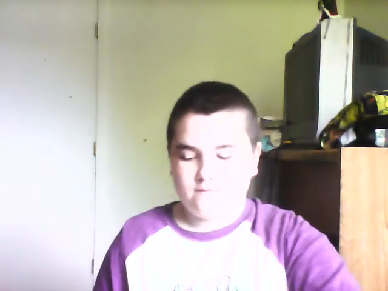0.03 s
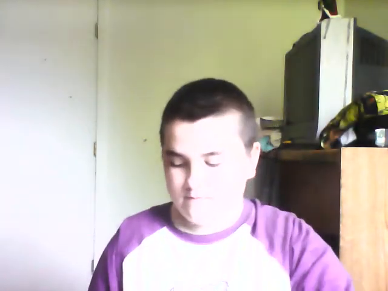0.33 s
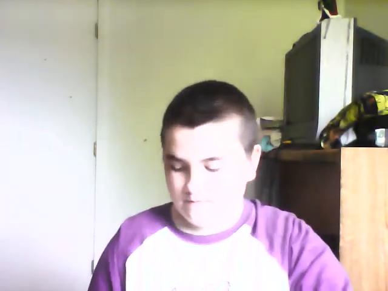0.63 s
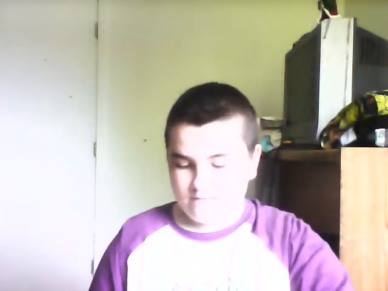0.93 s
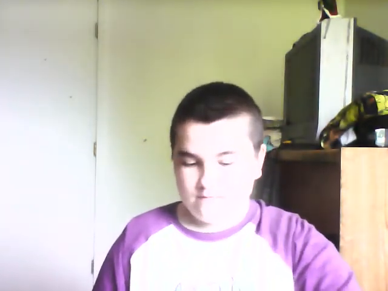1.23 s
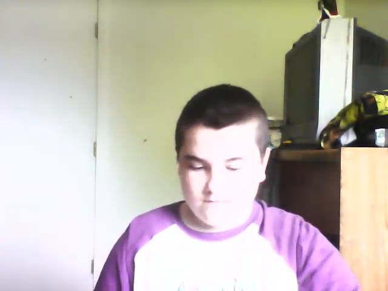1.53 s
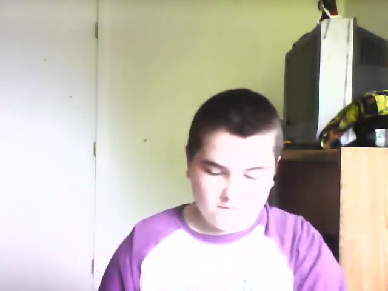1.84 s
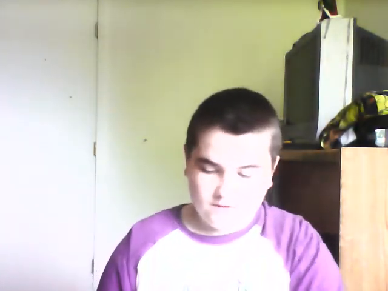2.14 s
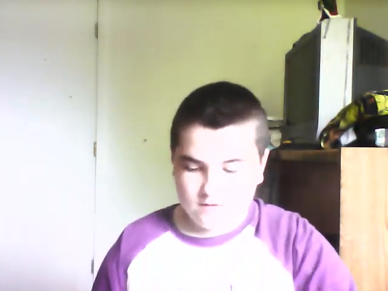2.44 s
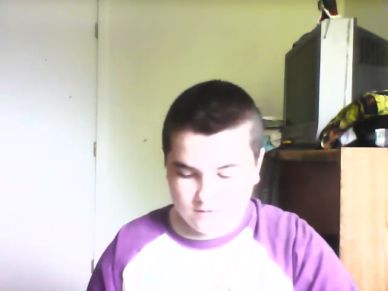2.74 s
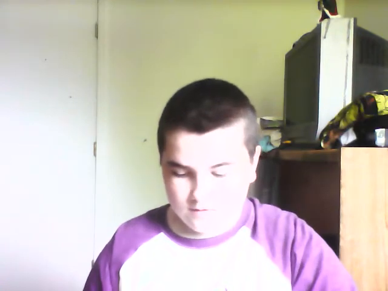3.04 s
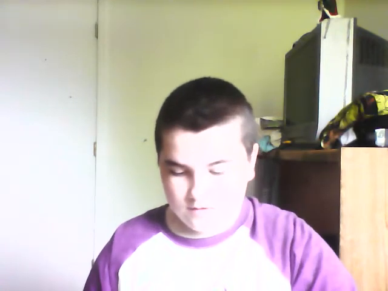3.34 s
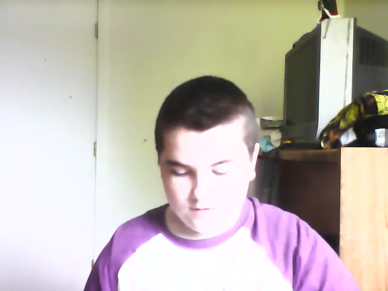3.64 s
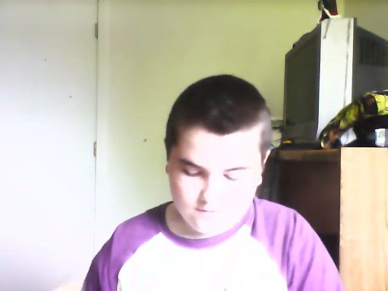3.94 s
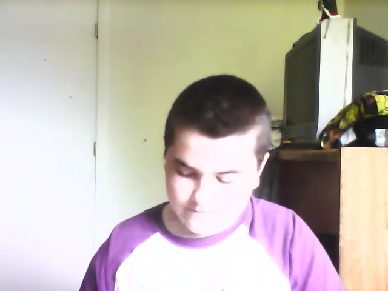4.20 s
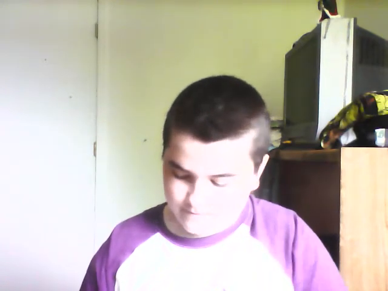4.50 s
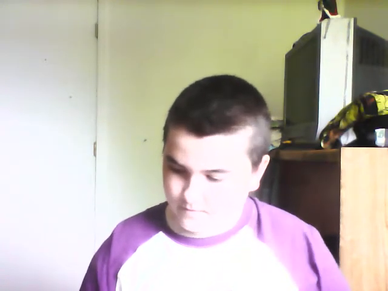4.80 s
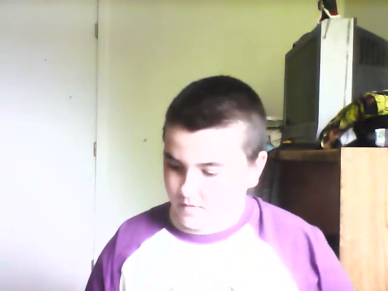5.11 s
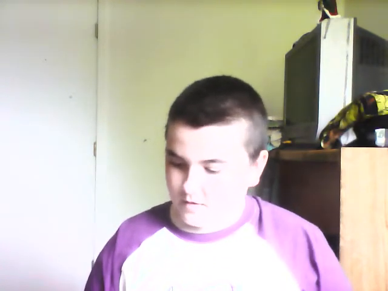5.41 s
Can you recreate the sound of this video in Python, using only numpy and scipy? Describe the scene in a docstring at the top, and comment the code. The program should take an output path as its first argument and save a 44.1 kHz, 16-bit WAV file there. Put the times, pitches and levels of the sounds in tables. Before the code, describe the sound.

A hardcover book is handled close to a small microphone in a quiet room. Faint rubbing leads into a page sliding across its neighbour, crinkling and flipping over with a sharp snap. After a brief lull, another page swishes across and flaps down with a few crisp snaps and a knock on the cover. Soft sliding and small ticks trail off over faint hiss.

```python
"""Sheets slide and rub as a hardcover book is handled close to a desk microphone in a small, quiet room.
Pages flap over and snap straight; the cover shifts and knocks. A faint hum comes and goes early on.
Rubs and swishes are filtered stick-slip clicks over hiss. Snaps and knocks are impulses with a brief
chatter: a damped ring plus a dry crack. Book resonances and a short room tail colour all but the hum
and the room and microphone hiss."""
import sys
import numpy as np
from scipy import signal
from scipy.fft import rfft, irfft, next_fast_len
from scipy.io import wavfile

SR = 44100
rng = np.random.default_rng(int(sys.argv[2]) if len(sys.argv) > 2 else 0)


def digitize_waveform(pressure):
    """Quantize a signal to 16-bit integers and store it at the path in sys.argv[1].

    Rows of a 2-D input are taken as channels; values are limited to [-1, 1].
    """
    field = np.atleast_2d(pressure).T
    bounded = np.clip(field, -1, 1)
    quanta = np.round(bounded * 32767).astype(np.int16)
    wavfile.write(sys.argv[1], SR, quanta)


N = 249517
TIME = np.arange(N) / SR

# Spectral shapes: freq_hz, relative_db
FLOOR_SPECTRUM = [(25, -6), (42, -6.5), (60, -18.5), (100, -23.5), (130, -9), (400, -4.5), (540, -2.5),
                  (800, -7.5), (1150, -11.5), (1380, -4.5), (1700, -24.5), (4000, -24), (8200, -23.5),
                  (10500, -28.5), (15500, -53)]  # room and microphone hiss
RUB_SPECTRUM = [(70, -27.5), (105, -40.5), (130, -14), (220, 1), (350, 2), (500, 6.5), (650, -2),
                (850, 1.5), (1300, -36)]  # cover rubbing
FLEX_SPECTRUM = [(400, -16.5), (650, -12.5), (890, 8.5), (1150, 1.5), (1750, 8), (2350, -3.5), (3000, -15),
                 (5000, -35)]  # sheets flexing
SLIDE_SPECTRUM = [(1500, -26), (2200, -2.5), (2800, 2.5), (3600, 0.5), (4700, 1.5), (6200, -4),
                  (8500, -16.5), (10000, -33.5), (15500, -40.5)]  # paper sliding
# Steady faint background hiss in the rub, flex and slide bands: rub_db, flex_db, slide_db
HISS_FLOOR_LEVELS = [-82.5, -78, -79]
# Short hand moves: start_s, length_s, rub_db, flex_db, slide_db
HAND_MOVES = [ (0.022, 0.0575, -72, -72.5, -66.5), (0.287, 0.0887, -61.5, -61.5, -61),
              (0.443, 0.0576, -70, -74.5, -55), (0.627, 0.054, -83, -76, -58.5),
              (1.244, 0.1385, -65, -53.5, -49), (1.426, 0.1855, -72, -64, -50),
              (1.511, 0.069, -49.5, -40.5, -70), (1.693, 0.127, -52.5, -38, -47),
              (1.91, 0.176, -55.5, -51.5, -52), (2.04, 0.1385, -46, -50, -51.5),
              (2.191, 0.1257, -61, -54, -50.5), (2.75, 0.0197, -76.5, -66, -58.5),
              (2.848, 0.197, -69.5, -62.5, -52), (3.201, 0.0615, -76, -60.5, -54.5),
              (3.317, 0.089, -58, -50.5, -47), (3.539, 0.0219, -55, -51, -75),
              (3.598, 0.36, -71, -64.5, -46.5), (4.004, 0.038, -61, -54.5, -57.5),
              (4.158, 0.1606, -77, -66, -53), (4.377, 0.112, -78, -67, -53), (4.464, 0.1316, -59, -59, -58),
              (5.182, 0.099, -70.5, -85.5, -70), (5.348, 0.0461, -78.5, -62, -52.5),
              (5.499, 0.0425, -63, -63.5, -61), (5.603, 0.025, -65, -76.5, -54.5)]
# Paper buckling, bumps on the page block: start_s, level_db, ring_hz, crack_re_ring_db, chatter_s
PAPER_SNAPS = [ (0.0638, -46, 2320, 2, 0.0067), (0.077, -50, 323, -1.5, 0.012),
               (0.276, -46, 3220, 2, 0.017), (0.341, -35.5, 5500, 9, 0.0113),
               (0.4734, -29, 2988, -18.5, 0.0036), (0.868, -36.5, 2760, 4.5, 0.004),
               (1.03, -37.5, 466, -6, 0.0056), (1.121, -30, 2150, 7.5, 0.0021),
               (1.1395, -29.5, 2150, -4.5, .006), (1.167, -36.5, 2206, -8, 0.0254),
               (1.354, -31, 2200, 16.5, 0.0057), (1.362, -33, 2646, 3.5, 0.0084),
               (1.6835, -24.5, 4100, 24, 0.0176), (1.725, -21.5, 1171, 5, 0.0117),
               (1.8125, -24.5, 2970, 8.5, 0.00254), (1.8409, -6, 2337, 2, 0.00259),
               (1.843, -23.5, 651, -8, 0.00227), (2.216, -28, 1020, 10.5, 0.0131),
               (2.5221, -33, 330, -32, 0.0013), (2.5534, -52.5, 353, -23.5, .004),
               (2.6156, -23, 4378, -11, 0.00688), (2.6312, -29, 3520, -11.5, 0.0072),
               (3.2284, -29, 4650, -18, 0.0054), (3.3404, -24.5, 1230, 34.5, 0.0067),
               (3.44, -32, 1410, -5.5, 0.0074), (3.636, -12.5, 1240, -4, 0.0028),
               (3.882, -18, 6850, -34.5, 0.0046), (3.8892, -13, 1150, 2.5, 0.00435),
               (4.659, -50, 2350, -4.5, 0.0073), (5.439, -52, 298, -15.5, 0.019)]
# Settling rustle re its snap or tap: rub_db, flex_db, slide_db
SETTLE_LEVELS = [-37, -29.5, -34]
# Ring pitch that stirs each rustle most: rub_hz, flex_hz, slide_hz
SETTLE_PITCHES = [300, 1092.4, 4940]
# Page drawn across its neighbour, one curve per draw: time_s, crinkle_db, hiss_db
PAGE_DRAWS = [
    [(0.695, -71, -61.5), (0.701, -53.5, -49), (0.715, -53.5, -46.5), (0.815, -60.5, -48.5),
     (0.963, -47, -36.5), (1.047, -43, -43), (1.081, -51, -43), (1.173, -56, -54.5), (1.25, -70.5, -64)],
    [(3.025, -54.5, -36.5), (3.037, -54.5, -49), (3.057, -51, -40), (3.097, -49, -37.5),
     (3.135, -49.5, -37.5), (3.215, -55, -63.5)],
]
# Page flaps and edge scrapes: peak_s, level_db, length_s, centre_hz, width_hz
PAGE_SWISHES = [ (0.703, -45, .014, 3330, 3020), (0.926, -52, 0.0458, 8800, 5960),
                (0.925, -43, .07, 3700, 3400), (1.315, -44.5, .05, 4420, 880),
                (1.306, -39.5, 0.0345, 2150, 800), (1.664, -46.5, .012, 1020, 933),
                (1.968, -38.5, 0.0146, 1150, 950), (2.223, -39.5, 0.0374, 1100, 995),
                (2.287, -57.5, 0.066, 7500, 6000), (2.848, -47, .014, 4400, 1500),
                (2.912, -50, .17, 4950, 850), (3.052, -56.5, 0.047, 8920, 7000),
                (3.039, -44, .012, 3980, 2980), (3.063, -33.5, .075, 3850, 1900),
                (3.385, -41, .01, 3340, 3700), (3.618, -28.5, .01, 1050, 675),
                (3.63, -24.5, 0.0135, 1400, 1300), (3.682, -17, 0.0178, 1700, 1404),
                (3.689, -27.5, 0.0367, 1080, 900), (3.879, -48, 0.0042, 8200, 4480),
                (3.892, -28, 0.0234, 1930, 3000), (4.201, -67, 0.252, 6400, 3967),
                (4.545, -71, 0.057, 7020, 6000), (5.335, -47, 0.014, 3960, 3900)]
# Hum envelope: time_s, level_db
HUM_LEVELS = [(0, -110), (1.0, -74), (1.3, -77.5), (1.5, -66), (1.8, -64.5), (2.0, -73.5), (2.25, -100)]
# Taps on the stiff cover: start_s, level_db, crack_re_ring_db
COVER_TAPS = [(1.2276, -46, -3.5), (1.579, -28.5, 1), (3.789, -11, 7), (5.331, -32.5, -8)]
# Room decay: freq_hz, t60_s
ROOM_DECAY = [(150, 0.44), (500, 0.279), (1500, 0.3233), (4000, 0.2685), (8000, 0.37), (15000, 0.51)]
# Modes of the open book on the desk: centre_hz, width_hz, gain_db
BOOK_MODES = [(663.8, 55, 1), (879, 240, -5.5), (1044, 28, -4), (1219, 17, -7.5), (1350, 29, -8.5),
              (1691, 23, -11), (2014, 22, 0), (2400.6, 100, -6), (2837, 150, -12), (4354, 39, -19)]


def from_db(db):
    """Decibels to gain."""
    return 10 ** (np.asarray(db) / 20)


def rms_one(x):
    """Scale to rms 1."""
    return x / np.sqrt(np.mean(x ** 2) + 1e-20)


def peak_one(x):
    """Scale to peak 1."""
    return x / (np.abs(x).max() + 1e-20)


def in_time(rows):
    """Curve columns, interpolated per sample."""
    time_s, *columns = np.transpose(rows)
    return [np.interp(TIME, time_s, column) for column in columns]


def at_hz(points, hz):
    """Table lookup on a log-frequency axis."""
    freq_hz, value = np.transpose(points)
    return np.interp(np.log(np.maximum(hz, 1)), np.log(freq_hz), value)


def coloured(x, spectrum):
    """Minimum-phase spectral shaping; rms 1."""
    size = next_fast_len(2 * (N // 2 + 1))
    gain = from_db(at_hz(spectrum, np.fft.rfftfreq(size, 1 / SR)))
    cepstrum = irfft(np.log(gain), size)
    cepstrum[1:size // 2] *= 2
    cepstrum[size // 2 + 1:] = 0
    return rms_one(irfft(rfft(x, size) * np.exp(rfft(cepstrum)), size)[:N])


def butter(x, edges_hz, kind, order):
    """Butterworth filter."""
    return signal.sosfilt(signal.butter(order, edges_hz, kind, fs=SR, output="sos"), x)


def band(x, low_hz, high_hz, order):
    """Band-pass, at least 1 % wide."""
    return butter(x, [min(low_hz, high_hz / 1.01), high_hz], "band", order)


def resonance(x, hz, width_hz, order):
    """Band-pass by geometric centre and width."""
    low_hz = np.hypot(hz, width_hz / 2) - width_hz / 2
    return band(x, low_hz, low_hz + width_hz, order)


def drift(rate_hz):
    """Gaussian values joined by ramps."""
    steps = rng.standard_normal(N // 20)
    return np.interp(TIME * rate_hz, np.arange(len(steps)), steps)


def noise_floor(level_db=-71):
    """Steady room and microphone hiss."""
    return from_db(level_db) * coloured(rng.standard_normal(N), FLOOR_SPECTRUM)


def friction(slips_per_s, spread_db, hiss_gain, flutter_db):
    """Fibres catch and slip: uneven clicks over hiss, under wavering pressure."""
    sizes = from_db(spread_db * np.minimum(rng.exponential(1, N), 4))
    signs = rng.choice([-1, 1], N)
    slips = rms_one(sizes * signs * (rng.random(N) < slips_per_s / SR))
    return (slips + hiss_gain * rng.standard_normal(N)) * from_db(flutter_db * drift(rate_hz=110))


def bending(x, depth=.55, rate_hz=32, relative_width=0.0843):
    """Resonances of a bending sheet come and go; rms 1."""
    modes_hz = np.geomspace(350, 7500, 22)
    modes = sum(drift(rate_hz) * resonance(x, hz, relative_width * hz, order=1) for hz in modes_hz)
    return rms_one(x + depth * modes)


def hand_moves(attack_s=.024, release_s=0.0306, sag_db_per_s=5):
    """Hand pressure builds, sags, lets go. Returns rub, flex, slide power."""
    power = np.zeros((3, N))
    for start_s, length_s, *levels_db in HAND_MOVES:
        t = np.maximum(TIME - start_s, 0)
        pressure = np.minimum(t / attack_s, 1) * from_db(-sag_db_per_s * t)
        release = np.exp(-np.maximum(t - length_s, 0) / release_s)
        power += np.outer(from_db(levels_db), pressure * release) ** 2
    return power


def handling():
    """The cover rubs dully; sheets crinkle as they flex and hiss as they slide."""
    power = hand_moves() + settling() + page_draws() + from_db(HISS_FLOOR_LEVELS)[:, None] ** 2
    rub_gain, flex_gain, slide_gain = np.sqrt(power)
    rub = friction(slips_per_s=900, spread_db=3.5, hiss_gain=.8, flutter_db=1.24)
    flex = bending(friction(slips_per_s=2700, spread_db=1.5, hiss_gain=1.0, flutter_db=3.03))
    slide = bending(friction(slips_per_s=5800, spread_db=3.5, hiss_gain=.9, flutter_db=2.5))
    return (rub_gain * coloured(rub, RUB_SPECTRUM)
            + flex_gain * coloured(flex, FLEX_SPECTRUM)
            + slide_gain * coloured(slide, SLIDE_SPECTRUM))


def contacts(tap_hz=941, tap_width_hz=254.5, tap_top_hz=4340, tap_chatter_s=.003):
    """Taps and snaps as rows: start_s, level_db, ring_hz, width_hz, crack_db, top_hz, chatter_s."""
    rows = [(start_s, level_db, tap_hz, tap_width_hz, crack_db, tap_top_hz, tap_chatter_s)
            for start_s, level_db, crack_db in COVER_TAPS]
    for start_s, level_db, ring_hz, crack_db, chatter_s in PAPER_SNAPS:
        # A smaller, stiffer patch rings higher and wider and cracks brighter.
        width_hz = 430.5 * (ring_hz / 1000) ** 0.76
        top_hz = 3670 * (ring_hz / 1000) ** 0.414
        rows.append((start_s, level_db, ring_hz, width_hz, crack_db, top_hz, chatter_s))
    return rows


def impact(ring_hz, width_hz, crack_db, top_hz, chatter_s, chatter_db=-19, crack_low_hz=330):
    """A sheet buckles or the cover is tapped: ring plus dry crack. Returns direct sound, room send."""
    t = TIME[:SR // 12]
    push = from_db(chatter_db) * rng.standard_normal(len(t)) * np.exp(-t / chatter_s) + 1e-18
    push[0] += 1
    ring = peak_one(resonance(push, ring_hz, width_hz, order=2))
    crack = band(push, crack_low_hz, top_hz, order=2)
    crack = peak_one(butter(crack, top_hz, "low", order=5))
    direct = peak_one(ring + from_db(crack_db) * crack)
    # Colour varies with direction: the room gets a broader band at equal power.
    broad = resonance(push, ring_hz, width_hz + 0.44 * ring_hz, order=1)
    send = rms_one(butter(broad, top_hz, "low", order=5)) * direct.std()
    return np.array([direct, send])


def snaps_and_taps():
    """One impact per contact. Returns direct sound, room send."""
    out = np.zeros((2, N + SR))
    for start_s, level_db, *shape in contacts():
        sound, start = impact(*shape), round(start_s * SR)
        out[:, start:start + sound.shape[1]] += from_db(level_db) * sound
    return out[:, :N]


def settling(rise_s=0.0041, fall_s=0.074, loss_db_per_octave=2.5):
    """Sheets come to rest after each contact. Returns rub, flex, slide power."""
    power, t = np.zeros((3, N + SR)), TIME[:SR]
    fade = np.minimum(t / rise_s, 1) * np.exp(-t / fall_s)
    for start_s, level_db, ring_hz, *_ in contacts():
        octaves = np.abs(np.log2(ring_hz / np.array(SETTLE_PITCHES)))
        gains = from_db(level_db + np.array(SETTLE_LEVELS) - loss_db_per_octave * octaves)
        start = round(start_s * SR)
        power[:, start:start + SR] += np.outer(gains, fade) ** 2
    return power[:, :N]


def page_draws(edge_s=0.014, rub_trim_db=-13.5, flex_trim_db=1, slide_trim_db=0.5):
    """A page catches, drags the cover along, comes free. Returns rub, flex, slide power."""
    power = np.zeros((3, N))
    for curve in PAGE_DRAWS:
        crinkle_db, hiss_db = in_time(curve)
        start_s, end_s = curve[0][0], curve[-1][0]
        gate = np.clip(np.minimum(TIME - start_s, end_s - TIME) / edge_s, 0, 1)
        levels_db = [crinkle_db + rub_trim_db, crinkle_db + flex_trim_db, hiss_db + slide_trim_db]
        power += (gate * from_db(levels_db)) ** 2
    return power


def page_swishes(rise_share=0.302, skirt_db=-12):
    """A page drags over its neighbours: dense slips swell and die in a band set by the free sheet."""
    out = np.zeros(N)
    slips = bending(friction(slips_per_s=5500, spread_db=3.5, hiss_gain=0.73, flutter_db=6.5))
    for peak_s, level_db, length_s, centre_hz, width_hz in PAGE_SWISHES:
        slope_s = length_s * np.where(TIME < peak_s, rise_share, 1 - rise_share)
        swell = np.exp(-((TIME - peak_s) / slope_s) ** 2)
        core = rms_one(resonance(slips, centre_hz, width_hz, order=3))
        skirt = rms_one(band(slips, centre_hz / 4, centre_hz + width_hz, order=4))
        out += from_db(level_db) * swell * (core + from_db(skirt_db) * skirt)
    return out


def hum(pitch_hz=201):
    """A faint low sine swells and fades."""
    level_db, = in_time(HUM_LEVELS)
    return from_db(level_db) * np.sqrt(2) * np.sin(2 * np.pi * pitch_hz * TIME)


def room(x, first_echo_s=0.0045, build_s=0.0011):
    """Walls and furniture return a dense tail: decaying noise bands, unit energy."""
    t, edges_hz = TIME[:SR * 2 // 3], np.geomspace(110, 16000, 9)
    tail = np.zeros(len(t))
    for low_hz, high_hz in zip(edges_hz, edges_hz[1:]):
        t60_s = at_hz(ROOM_DECAY, np.sqrt(low_hz * high_hz))
        tail += band(rng.standard_normal(len(t)), low_hz, high_hz, order=3) * from_db(-60 * t / t60_s)
    tail *= 1 - np.exp(-np.maximum(t - first_echo_s, 0) / build_s)
    return signal.fftconvolve(x, tail / np.sqrt(np.sum(tail ** 2)))[:N]


def book_body(x, trim_db=-2):
    """Covers and page block add their resonances."""
    modes = sum(from_db(db) * resonance(x, hz, width_hz, order=1) for hz, width_hz, db in BOOK_MODES)
    return from_db(trim_db) * (x + modes)


def microphone(x, bass_hz=120, treble_hz=8500):
    """Small microphone: steep bass cut, gentle treble roll-off."""
    return butter(butter(x, bass_hz, "high", order=9), treble_hz, "low", order=2)


def scene(rustle_db=-1, rustle_send_db=-12, snap_send_db=-8, swish_send_db=-6.5):
    """Book and room at the microphone, plus hum and hiss; mono."""
    rustle = from_db(rustle_db) * handling()
    swishes = page_swishes()
    snaps, snap_send = snaps_and_taps()
    echo = room(from_db(rustle_send_db) * rustle + from_db(snap_send_db) * snap_send
                + from_db(swish_send_db) * swishes)
    book = book_body(rustle + snaps + swishes + echo)
    return (microphone(book) + hum() + noise_floor())[None]


def record(dry, cutoff_hz=15730):
    """Steep elliptic low-pass."""
    return signal.sosfilt(signal.ellip(10, .1, 80, cutoff_hz, fs=SR, output="sos"), dry)


dry = scene()
out = record(dry)
digitize_waveform(out)
```